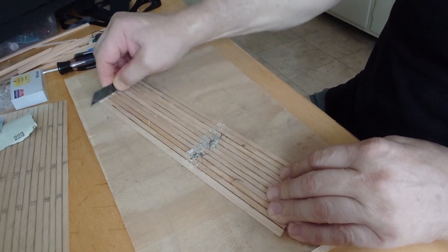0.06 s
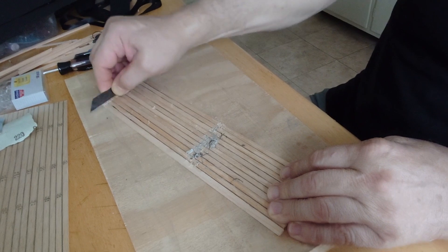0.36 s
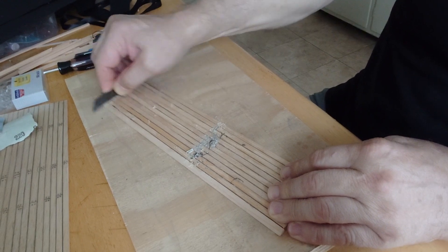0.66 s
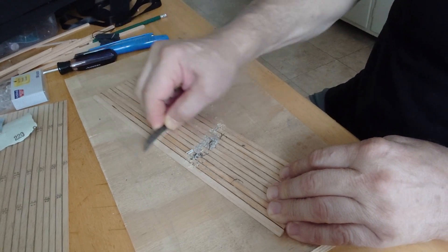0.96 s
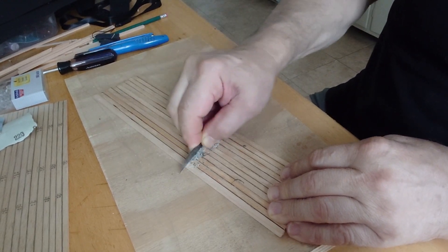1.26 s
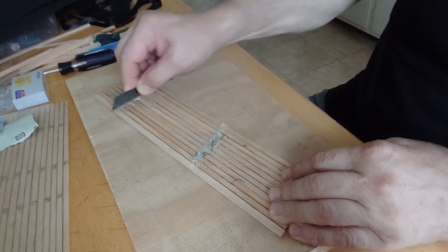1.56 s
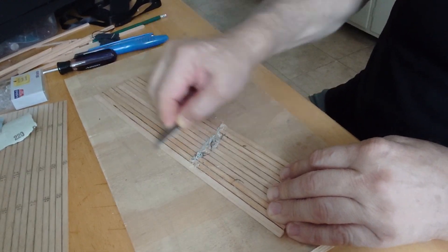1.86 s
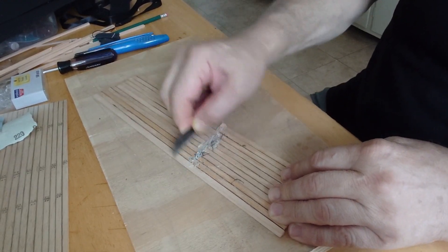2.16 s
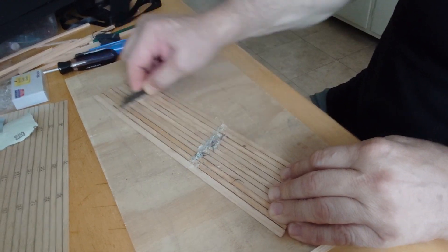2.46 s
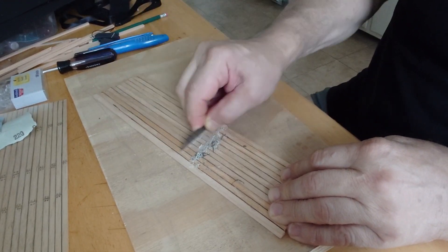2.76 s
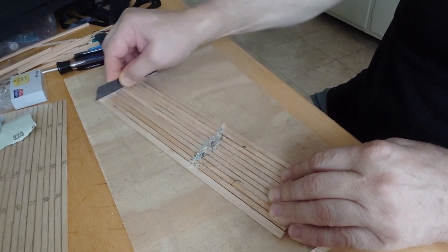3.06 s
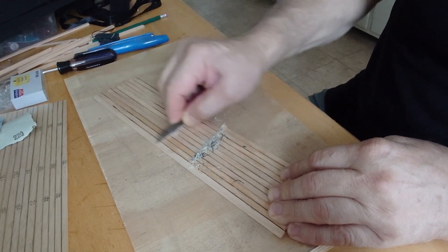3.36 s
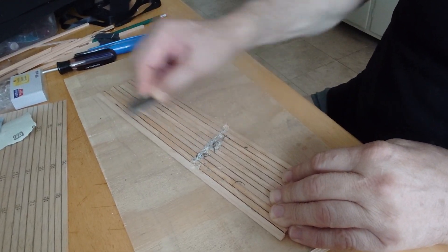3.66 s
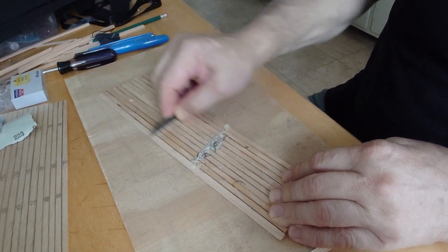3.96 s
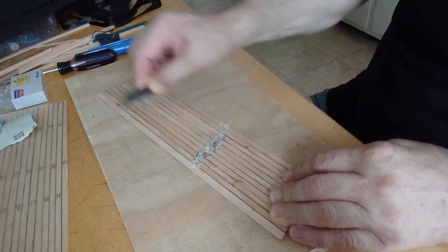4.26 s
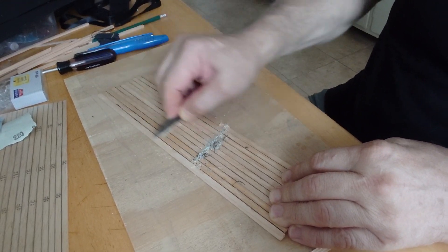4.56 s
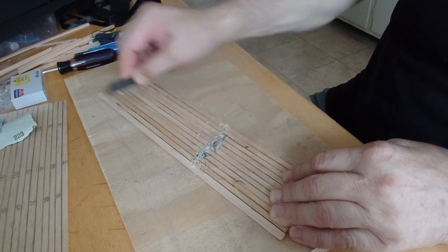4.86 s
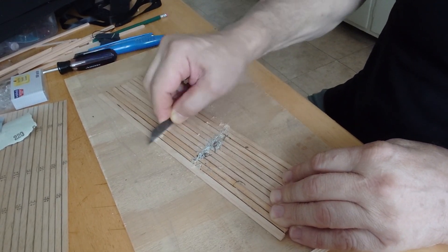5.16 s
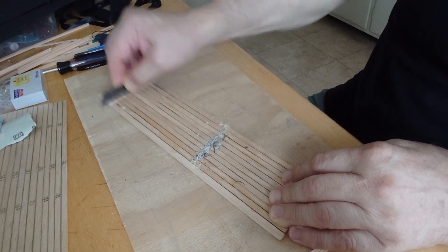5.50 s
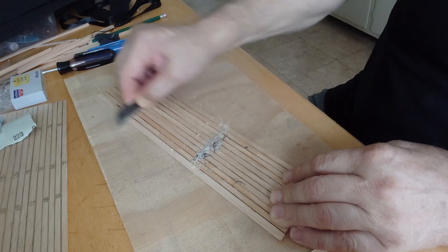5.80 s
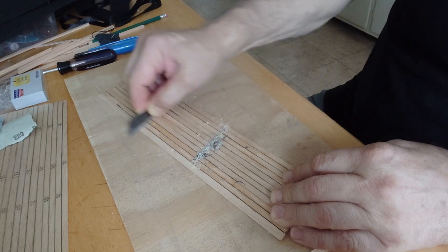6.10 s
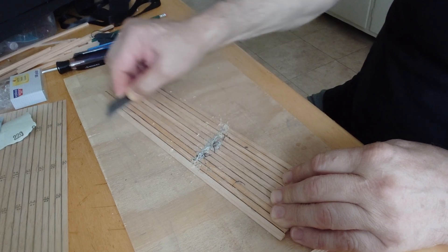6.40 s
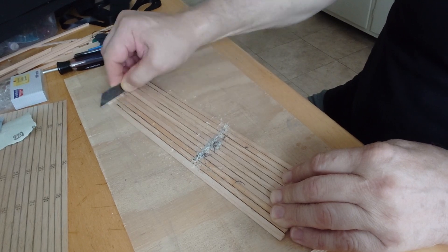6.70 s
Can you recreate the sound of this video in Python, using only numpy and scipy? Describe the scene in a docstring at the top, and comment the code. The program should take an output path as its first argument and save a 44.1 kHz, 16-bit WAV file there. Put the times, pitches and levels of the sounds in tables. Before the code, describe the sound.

Close, dry scraping of a steel blade on wood, longer strokes turning into quick back-and-forth ones, with light ticks and a faint hum.

```python
"""In a small, fairly echoey workshop, a bare craft blade scrapes glued wooden planking on a bench:
long single strokes, then quick ones to and fro. The edge ticks as it lands, then sticks and slips,
tearing countless tiny fibres whose snaps blend into a rasp. The planking and the bench rumble under
the hand. The walls answer, and a faint mains hum lies behind it all."""
import sys
import numpy as np
from scipy import signal
from scipy.fft import rfft, irfft, next_fast_len
from scipy.io import wavfile
from scipy.ndimage import uniform_filter1d, map_coordinates

SR = 44100
rng = np.random.default_rng(int(sys.argv[2]) if len(sys.argv) > 2 else 0)


def wrap_up_sound(samples):
    """Save the sound to the file named by the first command line argument, as 16-bit audio."""
    columns = np.atleast_2d(samples).T
    # keep every value between -1 and 1, then stretch to whole-number steps
    tamed = np.clip(columns, -1, 1)
    steps = np.round(tamed * 32767).astype(np.int16)
    wavfile.write(sys.argv[1], SR, steps)


N = 305957

# Strokes of the blade. Hiss, chatter and body count from the rasp; all table levels are relative.
# start_s, bite_s, push_s, fade_s, rasp_db, swell_db, hiss_db, chatter_db, body_db, rasp_centre_hz
STROKES = [ (0.0, 0.00063, .004, 0.062, -34, -3, -2, -11.5, -14, 4200),
           (0.241, 0.0034, 0.059, 0.075, -30, 5, -2.5, -11.5, -17, 3800),
           (0.372, 0.0092, .05, 0.034, -42, 4, -7, -7.5, -11.5, 3600),
           (0.525, .008, 0.065, 0.078, -33, 5, -2, -10, -16.5, 4000),
           (0.68, .01, 0.028, 0.044, -44, -6, -5, -9.5, -10, 3400),
           (0.753, 0.0052, 0.015, 0.037, -45, 4, -2, -4.5, -15, 3400),
           (0.812, 0.0065, 0.35, 0.12, -34.5, -2.5, -1, -11, -12.5, 3780),
           (1.352, 0.0045, 0.059, 0.037, -37.5, 4, -7, -11, -14, 3550),
           (1.828, 0.032, 0.23, 0.059, -29, 6.5, -2.3, -14.5, -24, 3950),
           (2.14, 0.0037, 0.054, 0.042, -39, 23, -4.5, -11, -11.5, 3520),
           (2.274, 0.0036, 0.034, .04, -49.5, -4, -7, -6.5, -15, 3230),
           (2.554, .002, 0.28, 0.051, -27.5, 7.5, -2.04, -13, -20.5, 3800),
           (2.874, 0.0017, 0.013, 0.025, -27.5, 0, -5, -23, -14, 3700),
           (2.914, 0.0076, 0.035, 0.047, -27, -5, -6.5, -14, -14.5, 3040),
           (3.01, .01, 0.029, .025, -46, 3, -3, -7, -14, 3200),
           (3.195, 0.012, 0.024, .012, -43, 8, 0, -10, -19, 3130),
           (3.273, 0.012, .27, 0.043, -25.5, 6, -2.5, -16, -22.5, 4050),
           (3.653, 0.0025, 0.034, 0.047, -32.5, -7, -2.5, -13, -12, 3020),
           (3.911, 0.0046, 0.016, 0.072, -54, -0.5, -10, -3, 0.5, 3600),
           (3.964, 0.0061, 0.25, 0.063, -22.5, 7, -3.5, -14.5, -24, 3950),
           (4.548, 0.0051, 0.24, 0.029, -23.5, 11.5, -4, -13.5, -23, 4200),
           (4.8, 0.006, 0.029, 0.065, -38, 0, -12, -17, -4.5, 3900),
           (5.085, 0.0044, 0.021, 0.031, -48, 0, -14, -5, 4, 3000),
           (5.125, 0.0073, 0.14, 0.099, -26, -3, -0.5, -18.5, -23, 3980),
           (5.423, 0.023, 0.097, 0.056, -26, 8.5, -3, -9.5, -16, 3000),
           (5.665, 0.004, 0.12, 0.11, -29.5, -1, -0.8, -14.5, -18.5, 4160),
           (5.877, 0.014, 0.074, 0.15, -27, -0.5, -2.5, -8, -19, 3570),
           (6.068, 0.021, 0.12, 0.042, -31, 1, -.5, -13.5, -27, 3980),
           (6.245, 0.0022, 0.082, 0.092, -28.5, 2.5, -3, -8.5, -18.5, 3730),
           (6.395, 0.015, 0.071, 0.054, -31, -7.5, -2, -13, -24, 4000),
           (6.515, .006, 0.079, 0.059, -29, 5.5, -1.5, -5.5, -18.5, 3700),
           (6.643, 0.011, 0.037, 0.093, -28.5, -6, -1, -12.5, -27, 3600),
           (6.76, 0.0058, .07, 0.042, -30.5, 4.5, -2, -10.5, -17, 4000),
           (6.866, 0.007, 0.081, .05, -28.5, 0, -2, -14.5, -33, 4180), ]


def scraping(rasp_gain, hiss_gain, chatter_gain, body_gain):
    """The edge sticks and slips, tearing fibres that sound in the steel and in the wood."""
    # The tone of each layer: pitch_hz, level_db
    rasp_tone = [(1000, -37), (1700, -19.5), (1950, -4.5), (2150, -1.5), (2490, -2.5), (2690, -2.5),
                 (3050, -4.5), (3460, -2.5), (4330, -3), (6220, -1.5), (7400, -10.5), (9000, -15),
                 (11700, -44), (19800, -120)]  # tearing fibres
    hiss_tone = [(5180, -13.5), (8800, -9), (10200, 1), (15100, -1), (15700, -0.5), (16200, -50),
                 (16300, -20), (16500, -47)]  # the sliding edge
    chatter_tone = [(500, -42), (850, -7.5), (1270, -4.5), (1380, 0), (1600, -5.5), (1730, -2),
                    (1900, -6.5), (2470, -24), (4180, -120)]  # the shaking blade
    wood_tone = [(140, -37.5), (240, -12), (313, -3), (376, -3.5), (471, -5.5), (553, -1.5), (594, -7.5),
                 (632, -4.5), (679, -6.5), (900, -6), (1170, -17), (1980, -120)]  # the body of the wood
    grip = unit(amp(0.55 * wobble(30) + 0.75 * wobble(260)))
    rasp = amp(3) * rasp_gain * coloured(fibres(16000, drift_db=2, boost=rasp_colour), rasp_tone)
    hiss = amp(3) * hiss_gain * coloured(fibres(16000, drift_db=1.1), hiss_tone)
    chatter_snaps = fibres(5000, drift_db=3, boost=plank_rings)
    chatter = amp(2.5) * chatter_gain * coloured(chatter_snaps, chatter_tone)
    body = amp(1.1) * body_gain * coloured(fibres(5000, drift_db=1.9, boost=plank_rings), wood_tone)
    coarse = fibres(200, drift_db=1.5, boost=rasp_colour)  # now and then a thicker fibre snaps
    splinters = amp(-12.5) * rasp_gain * coloured(coarse, rasp_tone)
    splinters += amp(-15.5) * hiss_gain * coloured(coarse, hiss_tone)
    return grip * (rasp + hiss + chatter + body + splinters)


def strokes():
    """Each stroke bites, swells under the push and fades: gains of rasp, hiss, chatter and body."""
    fade_curve = 1.41  # above 1 the blade slows gently, then stops
    # How strongly each layer follows swell and fade: the deep layers outlast the bright ones.
    swell_shares, fade_shares = [0.9, 0.53, 1, 0.16], [1.21, 1.56, 0.97, 0.5]
    power = np.zeros((4, N))
    for start, bite, push, fade, rasp_db, swell_db, hiss_db, chatter_db, body_db, _ in STROKES:
        first = round(start * SR)
        t = np.arange(min(SR, N - first)) / SR
        touch = 1 - np.exp(-t / bite)
        rise_db = -swell_db * np.maximum(1 - t / push, 0) ** 2
        fall_db = 15.5 * (np.maximum(t - push, 0) / fade) ** fade_curve
        for layer, over_db in enumerate((0, hiss_db, chatter_db, body_db)):
            level_db = rasp_db + over_db + swell_shares[layer] * rise_db - fade_shares[layer] * fall_db
            power[layer, first:first + len(t)] += (touch * amp(level_db)) ** 2
    return np.sqrt(power)


def fibres(snaps_per_s, drift_db, boost=lambda hz: 0):
    """Tiny snaps of uneven size; narrow resonances come and go as the edge travels along the grain."""
    snapping = rng.random((2, N)) < snaps_per_s / SR
    snaps = snapping * rng.standard_normal((2, N)) * amp(2.5 * rng.standard_normal(N))
    hz, _, spectra = signal.stft(snaps, SR, nperseg=1024)
    grain = uniform_filter1d(rng.standard_normal(spectra.shape[1:]), size=3, axis=0)  # smooth in pitch
    grain = uniform_filter1d(grain, size=7, axis=1)  # and in time
    return signal.istft(spectra * amp(drift_db * unit(grain) + boost(hz)), nperseg=1024)[1][:, :N]


def rasp_colour(hz, lift_db=6, width_octaves=0.51, sag_octaves=0.24):
    """Boost in dB: the ringing planks, and a broad peak that sinks as the fingers tilt the blade."""
    moments = signal.stft(np.zeros(N), SR, nperseg=1024)[1]
    centre_hz = np.zeros(len(moments))
    for start, _, push, fade, *_, stroke_hz in STROKES:
        begun = moments >= start
        travel = np.minimum((moments[begun] - start) / (push + fade), 1)
        centre_hz[begun] = stroke_hz * 2 ** (sag_octaves * (.5 - travel))
    octaves_away = np.log2((hz[:, None] + 1) / centre_hz)
    return plank_rings(hz) + lift_db * np.exp(-.5 * (octaves_away / width_octaves) ** 2)


def plank_rings(hz):
    """Boost in dB at the pitches where the planks like to ring."""
    # Narrow resonances of the planks: pitch_hz, width_hz, strength_db
    rings = [(572, 23, -2.5), (648, 20, -4), (1450, 53, -5.5), (1777, 33, -0.5), (2390, 60, -12),
             (3013, 140, -1.5), (3380, 20, -23.5), (4260, 66, -6)]
    return 5 * sum(amp(db) / (1 + (2 * (hz[:, None] - pitch) / width) ** 2) for pitch, width, db in rings)


def contacts():
    """The edge grazes the wood, then the steel ticks, the planks knock and the board below thuds."""
    # The tone of the struck steel, planks and board: pitch_hz, level_db
    tick_tone = [(3000, -8.5), (6000, -3), (8500, -13.5), (10500, 8.5), (15500, 1.5), (18000, -6.5)]
    knock_tone = [(600, -25), (1400, 1), (2200, 1), (3500, 3), (5500, 0), (8000, -12.5), (14000, -30.5)]
    thud_tone = [(30, -40), (70, -11), (200, -4), (400, 6), (700, 2.5), (1200, 7), (2200, -15),
                 (5000, -57.5)]
    steel, planks, board = 1, 2, 3  # columns of the landings in blows()
    tick = amp(14.5) * blows(steel, tick_tone, ring_s=.003, ring_db=-2)
    graze = amp(0.5) * blows(planks, knock_tone, ring_s=.022, ring_db=20, delay_s=-.002)
    knock = amp(18) * blows(planks, knock_tone, ring_s=.018, ring_db=11)
    thud = amp(22.5) * blows(board, thud_tone, ring_s=.045, ring_db=8)
    return graze + tick + knock + thud


def blows(column, tone, ring_s, ring_db, delay_s=.001, softness=0.43, size=4096):
    """Each landing is a sharp push, then a dense ring; lighter touches stretch the ring into a scuff."""
    # The blade lands or catches on a ridge: start_s, tick_db, knock_db, thud_db
    landings = [(0.203, -46, -42, -53), (0.2076, -17.5, -18.5, -36.5), (0.242, -31, -23, -35),
                (0.5084, -8.5, -14, -32), (0.5403, -21, -37, -41), (0.812, -21, -25, -50),
                (0.824, -21, -39, -54), (1.306, -35, -34, -43), (1.3525, -28.5, -27.5, -48),
                (1.531, -34, -32, -45), (1.7679, -40, -34, -44), (1.783, -41, -42, -60),
                (2.1415, -28, -41, -43.5), (2.529, -46, -32, -39), (2.5359, -26, -21.5, -30.5),
                (2.5538, -23, -33, -48), (2.876, -17, -19.5, -51), (2.9227, -19, -25, -42),
                (3.1926, -35, -44, -63), (3.264, -45, -37, -62), (3.273, -19.5, -32, -61),
                (3.6503, -25, -23, -35), (3.9297, -46, -32, -36.5), (3.9725, -32, -39, -32),
                (4.2852, -27, -22, -46), (4.2995, -28.5, -39, -34.5), (4.5006, -35, -32.5, -39.5),
                (4.8258, -13, -18, -47), (4.877, -31, -34, -55), (4.892, -21.5, -22, -47),
                (5.083, -33, -34, -44), (5.0947, -45, -27, -31), (5.138, -25, -14.5, -42),
                (5.1539, -11.5, -11.5, -30), (5.534, -32, -18, -32), (5.659, -38, -22, -29),
                (5.664, -18, -11, -22), (6.247, -32, -26, -44), (6.524, -37.5, -31, -38),
                (6.8686, -17, -25, -47)]
    out = np.zeros((2, N + 2 * size))
    t = np.arange(size) / SR
    push = impulse(tone)
    hardest_db = max(landing[column] for landing in landings)
    for landing in landings:
        smear = amp(softness * (hardest_db - landing[column]))
        ring = rng.standard_normal((2, size)) * amp(-60 * t / (ring_s * smear))
        ring *= smear * amp(ring_db) / np.linalg.norm(ring[0])
        ring[:, 0] = 1  # the push itself
        blow = signal.fftconvolve(ring, push[None], axes=1)
        start = round((landing[0] + delay_s) * SR)
        out[:, start:start + blow.shape[1]] += amp(landing[column]) * blow / np.linalg.norm(blow[0])
    return out[:, :N]


def bench_rumble():
    """The dragging hand shakes the bench."""
    # How hard the bench shakes: time_s, level_db
    shaking = [(0.0, -51), (0.04, -63), (0.23, -52.5), (0.75, -58), (0.81, -51), (1.51, -68), (1.6, -49),
               (1.85, -64.5), (1.89, -51), (2.05, -62), (2.11, -51), (2.18, -72), (2.63, -50), (2.86, -59),
               (2.88, -41), (3.11, -72), (3.59, -50), (3.88, -61), (3.98, -51), (4.08, -56), (5.28, -56),
               (5.31, -64), (5.62, -57), (5.68, -35), (5.8, -62), (6.4, -62), (6.45, -46.5), (6.94, -72)]
    # The deep tone of the bench: pitch_hz, level_db
    bench_tone = [(20, -56.5), (36, -25), (55, 5), (75, 2), (100, 1.5), (140, 5.5), (200, -14), (500, -75)]
    return amp(over_time(shaking) + 5) * coloured(rng.standard_normal((2, N)), bench_tone)


def planking_drum(body_gain):
    """The planking drums on its plywood board: with the scrape, in judders and under the holding hand."""
    # Judders, mostly as the blade reaches the middle of the planking: peak_s, level_db, half_length_s
    judders = [(0.378, -43, 0.036), (0.587, -41.5, 0.042), (0.9, -40.5, 0.028), (0.97, -32.5, 0.045),
               (1.143, -37.5, 0.035), (1.43, -51, 0.035), (1.618, -52.5, 0.034), (2.05, -46.5, 0.071),
               (2.204, -48, .025), (2.62, -46.5, 0.046), (2.767, -39.5, 0.047), (2.89, -37.5, 0.066),
               (3.586, -45, .03), (3.687, -51, .025), (4.24, -40, 0.047), (4.81, -34, 0.033),
               (5.22, -55, .05), (5.56, -50, 0.061), (5.682, -41, 0.033), (6.53, -52, .08)]
    # Low resonances of the planking on its board: pitch_hz, width_hz, level_db
    resonances = [(165.4, 35, -3), (186.4, 18.6, 4), (219.4, 39, -3), (249, 31, -6)]
    judder_power = sum((amp(db) * np.exp(-.5 * ((clock() - peak) / half_length) ** 2)) ** 2
                       for peak, db, half_length in judders)
    scrape_gain, holding_gain = amp(-4.5) * body_gain, amp(-57.5)
    gain = np.sqrt(judder_power + scrape_gain ** 2 + holding_gain ** 2)

    def response(hz):
        ringing = sum((-1) ** k * amp(db) * 1j * hz * width / (pitch ** 2 - hz ** 2 + 1j * hz * width)
                      for k, (pitch, width, db) in enumerate(resonances))
        return ringing / (1 + (hz / 330) ** 4)  # the soft hand dulls the highs

    return gain * spread(rng.standard_normal((2, N)), response)


def workshop(sound, delay_s=.004, patterns=12):
    """The walls answer, each pitch dying at its own speed; the echo pattern shifts as the hand moves."""
    # Time the echo takes to fall by 60 dB: pitch_hz, decay_s
    decays = [(150, 0.38), (600, 0.63), (2000, 0.42), (5000, 0.44), (10000, 0.35), (16000, 0.3)]
    out = np.zeros((2, N))
    place = np.linspace(0, patterns - 1, N)
    for k in range(patterns):
        hz, t, spectra = signal.stft(rng.standard_normal((2, SR * 3 // 4)), SR, nperseg=256)
        tail = signal.istft(spectra * amp(-60 * t / over_pitch(decays, hz)[:, None]), SR, nperseg=256)[1]
        tail = np.pad(tail / np.linalg.norm(tail[0]), ((0, 0), (round(delay_s * SR), 0)))
        share = np.sqrt(np.maximum(1 - abs(place - k), 0))  # blend each pattern into the next
        out += signal.oaconvolve(sound * share, tail, axes=1)[:, :N]
    return out


def hum_and_air(mains_hz=120):
    """A slightly wavering mains hum over the soft noise of still air."""
    # The hum swells and sinks: time_s, level_db
    hum_levels = [(0, -58), (3.7, -54), (4.25, -46.5), (4.6, -54.5), (5.3, -48.5), (6.9, -55)]
    # The tone of the still room: pitch_hz, level_db
    air_tone = [(25, -46), (60, 2.5), (200, 3.5), (400, -3.5), (1000, -15), (4000, -24), (16000, -33)]
    hum_gain = amp(over_time(hum_levels) + wobble(1.9))
    hum = hum_gain * np.sqrt(2) * np.sin(2 * np.pi * mains_hz * clock() + 0.37 * wobble(0.97))
    return hum + amp(-56.5) * coloured(rng.standard_normal((2, N)), air_tone)


def amp(db):
    """Turn decibels into a gain to multiply by."""
    return 10 ** (np.asarray(db) / 20)


def unit(x):
    """Scale a signal to an average size (rms) of 1."""
    return x / np.sqrt(np.mean(x ** 2) + 1e-20)


def clock():
    """The time of every sample, in seconds."""
    return np.arange(N) / SR


def over_time(points):
    """Join (time_s, value) points into one value per sample."""
    return np.interp(clock(), *np.transpose(points))


def over_pitch(points, hz):
    """Read between (pitch_hz, value) points, with octaves evenly spaced."""
    pitches, values = np.transpose(points)
    return np.interp(np.log(hz + 1), np.log(pitches + 1), values)


def wobble(rate):
    """A smooth curve through `rate` random values a second."""
    return map_coordinates(rng.standard_normal(int(N * rate / SR) + 4), [clock() * rate])


def filtered(x, response):
    """Multiply each frequency in x by response(hz)."""
    size = next_fast_len(N + 8192)
    return irfft(rfft(x, size) * response(np.fft.rfftfreq(size, 1 / SR)), size)[..., :N]


def spread(pair, response):
    """Filter two unrelated signals into stereo of rms 1, alike in the bass and unrelated in the treble."""
    # How alike left and right are (1 is the same): pitch_hz, likeness
    likeness = [(60, 0.86), (160, 0.59), (450, 1), (900, 0.32), (2000, 0.66), (3300, 0.078), (5500, 0.0),
                (15000, .02)]
    shares = lambda hz: np.sqrt(1 + np.outer([1, -1], np.clip(over_pitch(likeness, hz), -1, 1)))
    mid, side = filtered(pair, lambda hz: response(hz) * shares(hz))
    return unit(np.array([mid + side, mid - side]))


def coloured(pair, tone):
    """Stereo of rms 1, shaped by a tone table."""
    return spread(pair, lambda hz: amp(over_pitch(tone, hz)))


def impulse(tone, size=2048):
    """A click of energy 1, shaped by a tone table."""
    cepstrum = irfft(np.log(amp(over_pitch(tone, np.fft.rfftfreq(size, 1 / SR)))))
    # Folding the second half onto the first packs the energy at the start of the click.
    cepstrum[1:size // 2] *= 2
    cepstrum[size // 2 + 1:] = 0
    click = irfft(np.exp(rfft(cepstrum)))
    return click / np.linalg.norm(click)


def scene():
    """Blade and bench, close by, in the room."""
    # The whole sound dips briefly: time_s, level_db
    dip = [(2.98, -0.5), (3.08, -7.5), (3.17, -12), (3.2, -5)]
    rasp_gain, hiss_gain, chatter_gain, body_gain = strokes()
    scrape = scraping(rasp_gain, hiss_gain, chatter_gain, body_gain)
    hits = contacts()
    echo = workshop(amp(-7.5) * scrape + amp(-6) * hits)
    mix = scrape + hits + echo + hum_and_air() + bench_rumble() + planking_drum(body_gain)
    return amp(over_time(dip)) * mix


def record(dry):
    """Two slightly unlike microphones, the left a little farther off; the lowest and highest sounds are cut."""
    # How the microphones differ in tone: pitch_hz, left_over_right_db
    tilt = [(60, -3), (110, -2.2), (200, -4.5), (380, 1.5), (700, -2.5), (1290, -2.0), (2380, 0.5),
            (4400, -0.9), (8120, -1.5), (15000, 2.5)]
    lag_s, low_cut_hz, top_hz = 55e-6, 24, 15750

    def response(hz):
        balance = amp(np.outer([.5, -.5], over_pitch(tilt, hz)))
        lag = np.exp(np.outer([-1j, 1j], np.pi * lag_s * np.minimum(hz, 3000)))
        low_cut = hz ** 4 / (hz ** 4 + low_cut_hz ** 4)
        high_cut = 1 / np.sqrt(1 + (hz / top_hz) ** 300)
        return balance * lag * low_cut * high_cut

    return filtered(dry, response)


dry = scene()
out = record(dry)
wrap_up_sound(out)
```